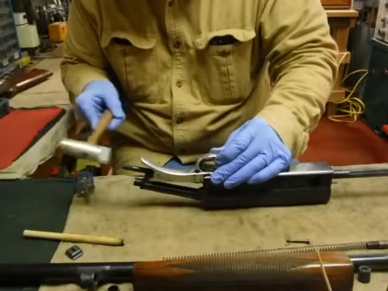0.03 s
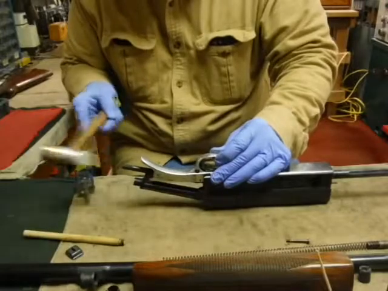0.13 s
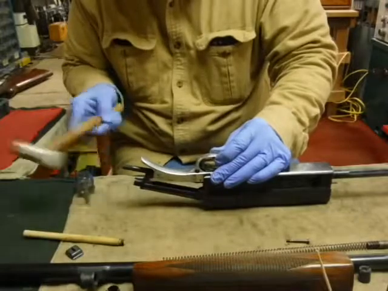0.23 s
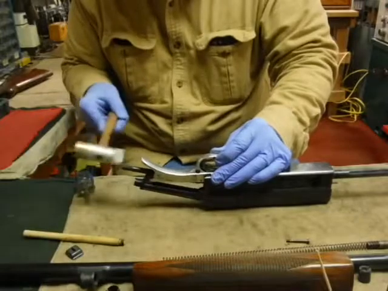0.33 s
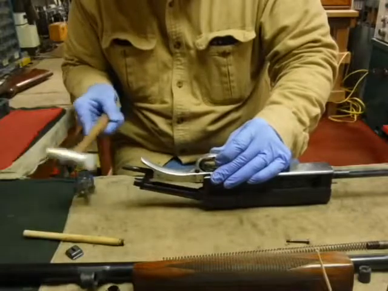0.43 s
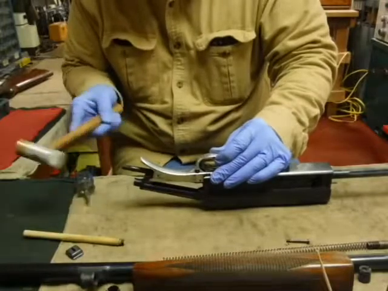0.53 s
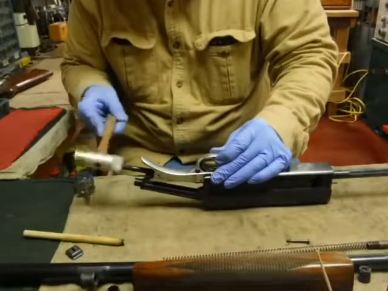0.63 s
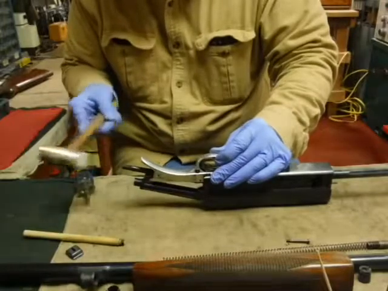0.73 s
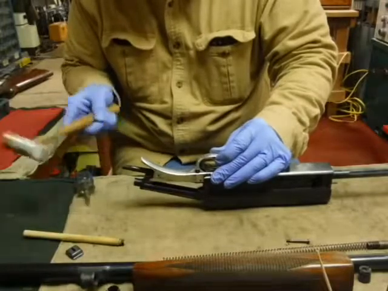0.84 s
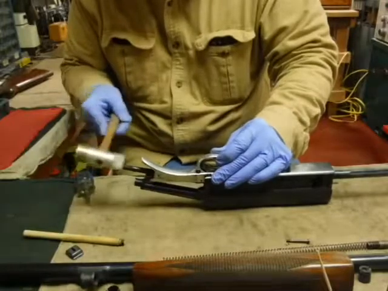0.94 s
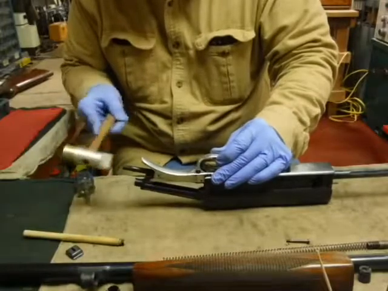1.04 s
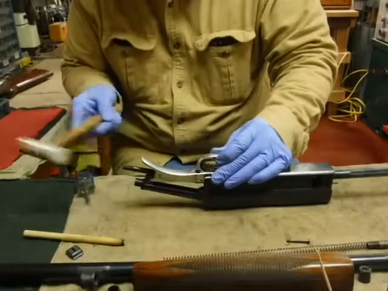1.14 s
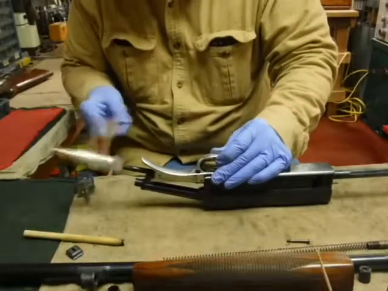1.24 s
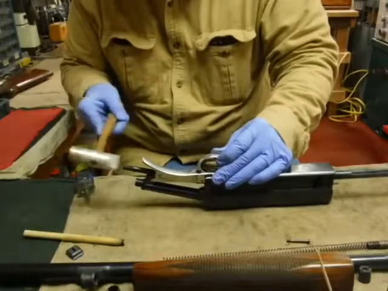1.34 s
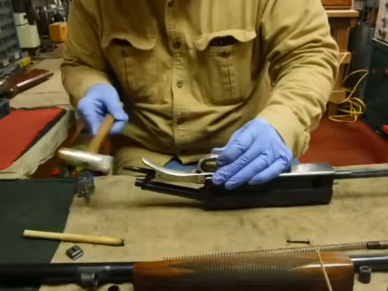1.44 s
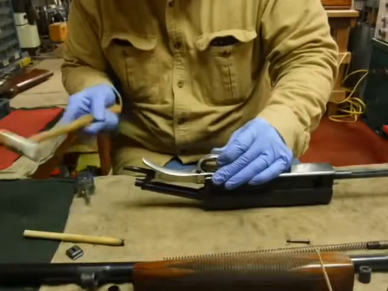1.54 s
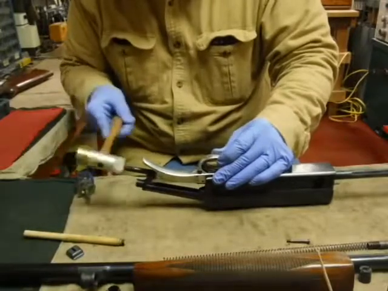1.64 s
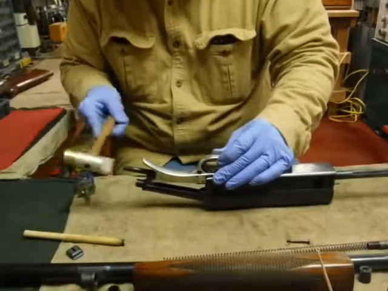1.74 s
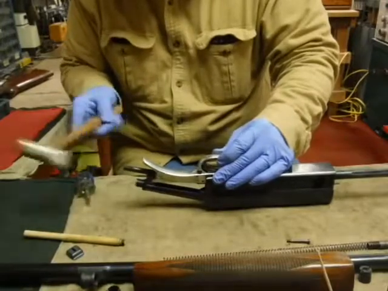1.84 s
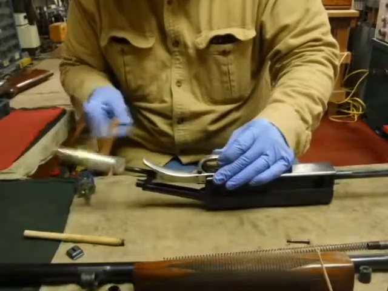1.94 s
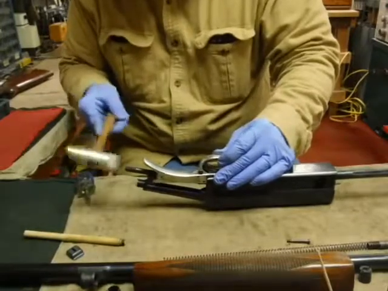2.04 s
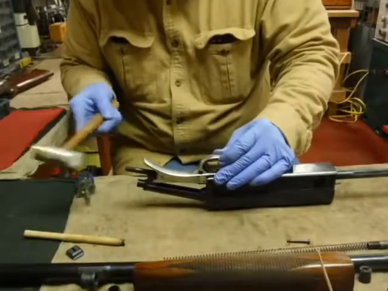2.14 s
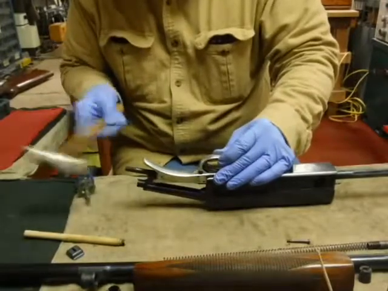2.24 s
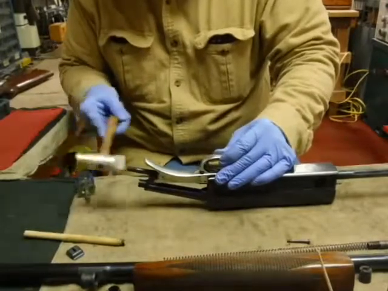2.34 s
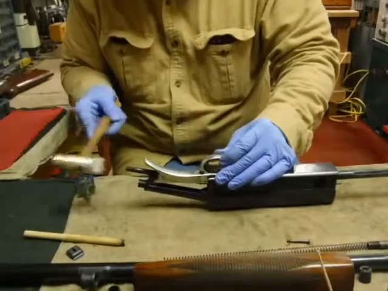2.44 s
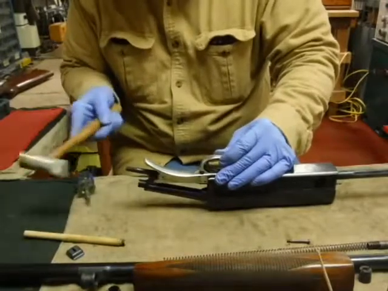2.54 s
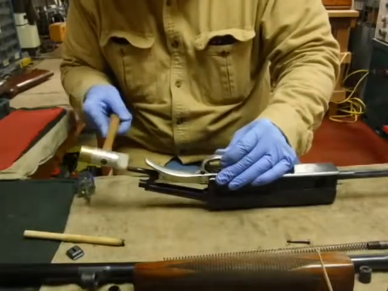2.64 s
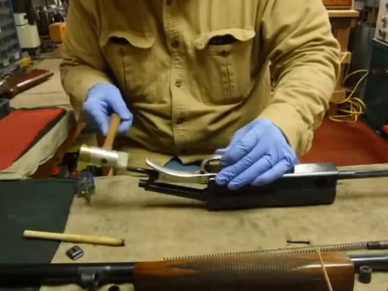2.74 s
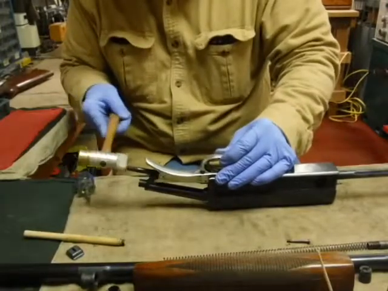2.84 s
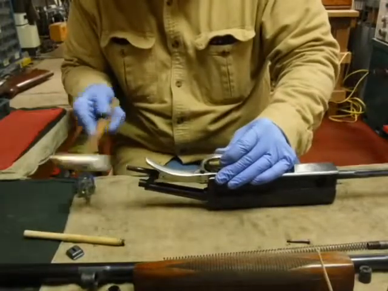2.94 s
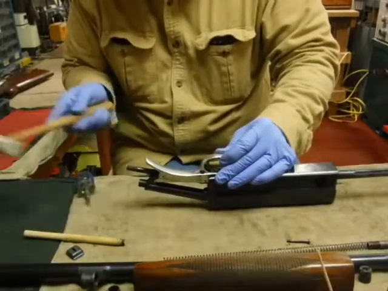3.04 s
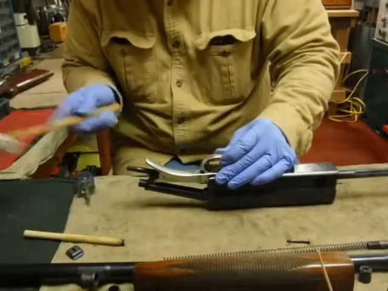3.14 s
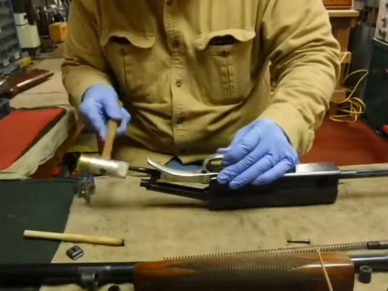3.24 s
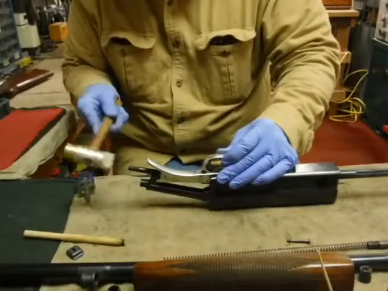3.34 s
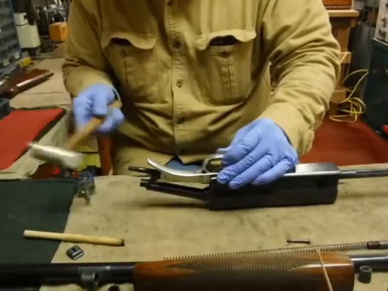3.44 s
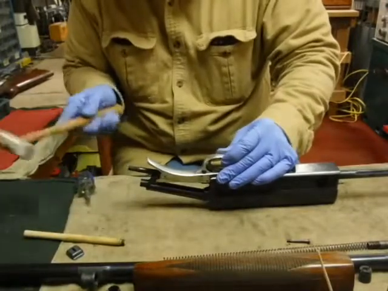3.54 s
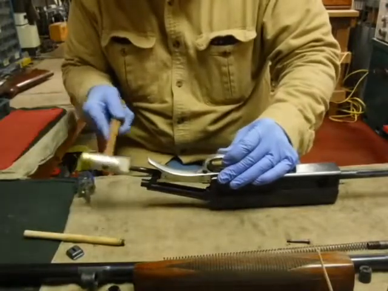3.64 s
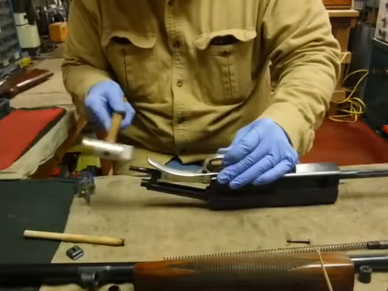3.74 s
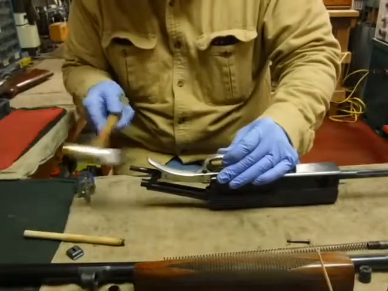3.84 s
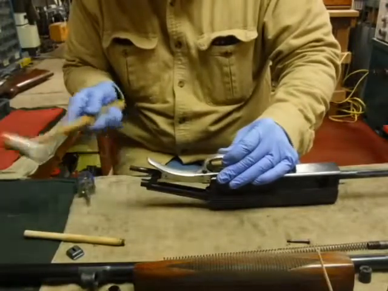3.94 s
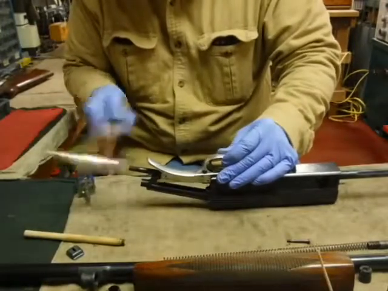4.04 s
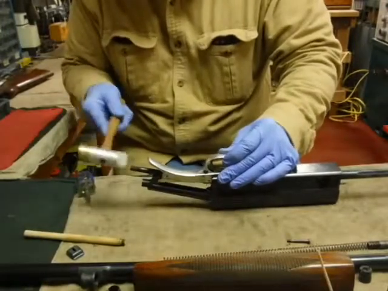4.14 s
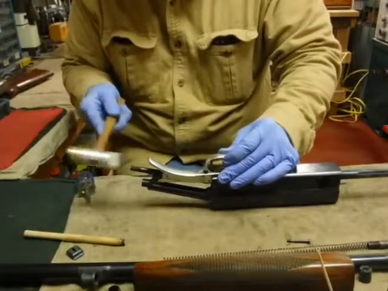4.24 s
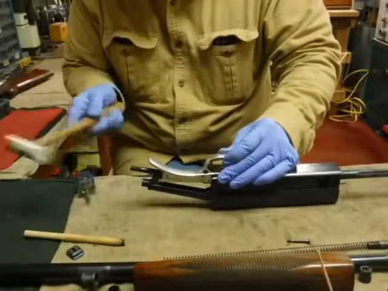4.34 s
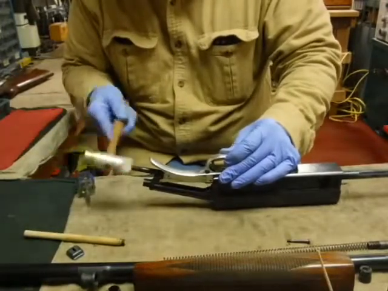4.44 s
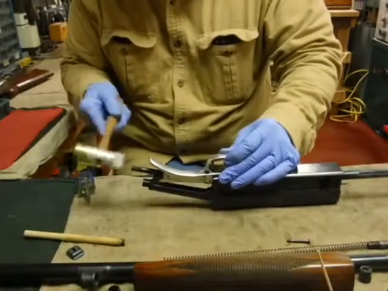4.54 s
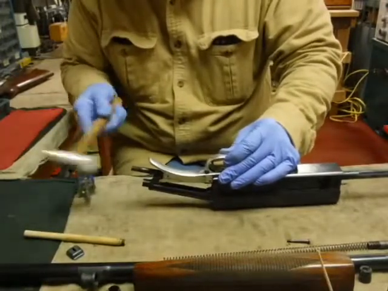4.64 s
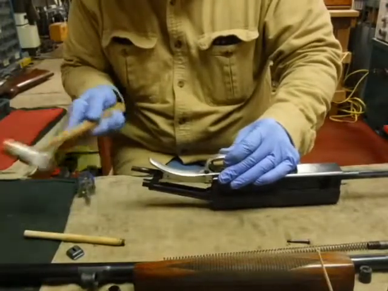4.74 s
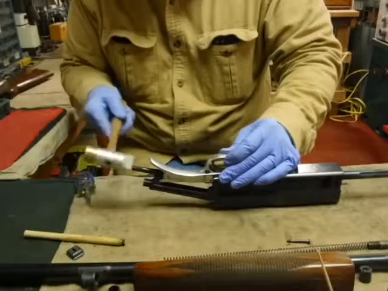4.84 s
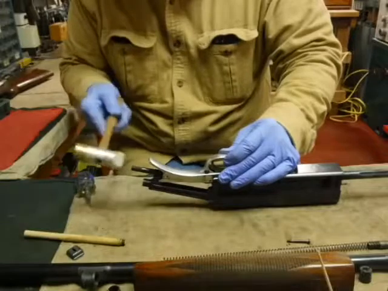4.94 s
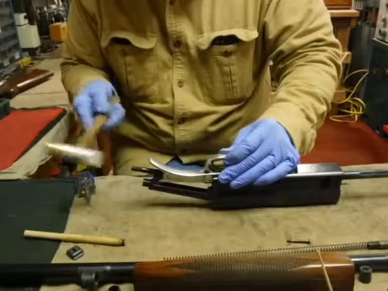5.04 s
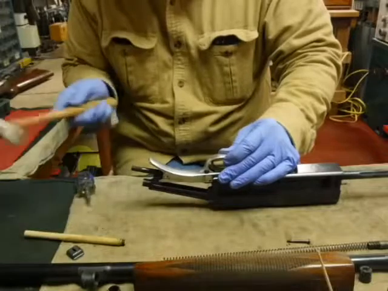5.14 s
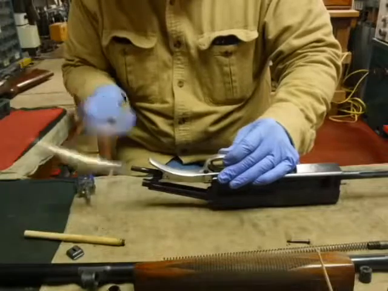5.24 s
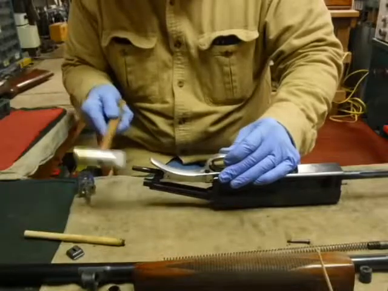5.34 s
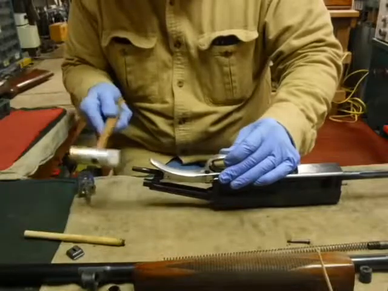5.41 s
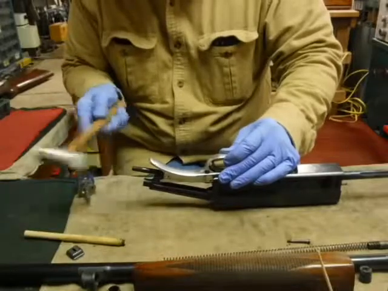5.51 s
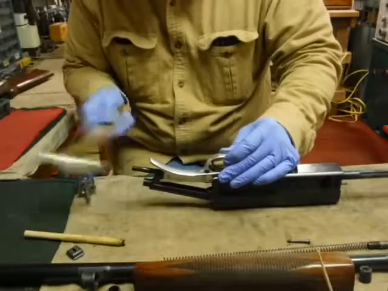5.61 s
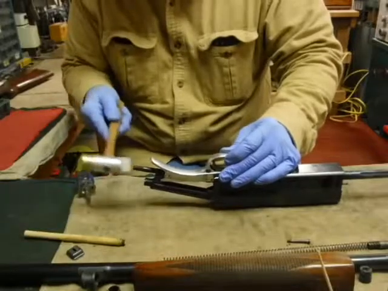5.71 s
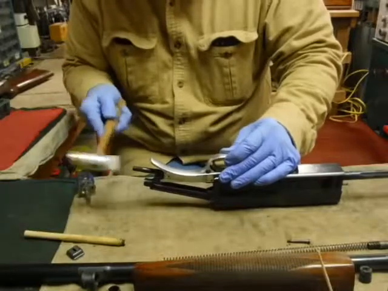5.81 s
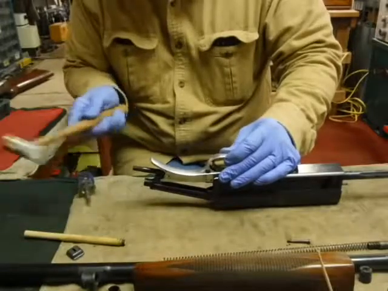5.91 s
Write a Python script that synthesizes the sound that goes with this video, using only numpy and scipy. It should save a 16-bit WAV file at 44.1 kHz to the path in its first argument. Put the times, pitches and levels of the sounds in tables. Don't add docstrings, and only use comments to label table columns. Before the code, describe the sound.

A small hammer strikes an aluminium part on a workbench in steady, sharp, clattering metallic blows, each ringing briefly and overloading the close microphone.

```python
import sys
import numpy as np
from scipy import signal
from scipy.io import wavfile

SR = 44100
rng = np.random.default_rng(int(sys.argv[2]) if len(sys.argv) > 2 else 0)


def rack_gain(trim_db):
    fader = np.asarray(trim_db, float)
    return 10 ** (fader / 20)


def dump_mix(stems):
    frames = np.atleast_2d(stems).T
    limited = np.clip(frames, -1, 1)
    pcm = np.round(limited * 32767).astype(np.int16)
    wavfile.write(sys.argv[1], SR, pcm)


N = 263256
TAIL = SR // 2


def at_hz(points, hz):
    points = np.array(points)
    return np.interp(np.log(hz), np.log(points[:, 0]), points[:, 1])


def rms_one(x):
    return x / np.sqrt(np.mean(x ** 2) + 1e-20)


def dying(t60_s):
    return rack_gain(-60 * np.arange(TAIL) / SR / t60_s)


def bandpass(x, order, low_hz, high_hz):
    return signal.sosfilt(signal.butter(order, [low_hz, high_hz], "band", fs=SR, output="sos"), x)


def third_octaves(white):
    edges_hz = 20.7 * 2 ** np.arange(0, 9.7, 1 / 3)
    for k, (low_hz, high_hz) in enumerate(zip(edges_hz, edges_hz[1:])):
        yield np.sqrt(low_hz * high_hz), bandpass(white[k % 2], 2, low_hz, high_hz)


def add(out, start_s, sound):
    at = round(start_s * SR)
    piece = sound[max(-at, 0):N - at]
    first = max(at, 0)
    out[first:first + len(piece)] += piece


def resonate(x, hz, width_hz):
    r = np.exp(-np.pi * width_hz / SR)
    struck = x * np.sqrt(2 * (1 - r * r))
    struck[:, 0] = np.sign(x[:, 0])
    return signal.lfilter([1, 0, -1], [1, -2 * r * np.cos(2 * np.pi * hz / SR), r * r], struck) / 2


def blows():
    # start in s, force in dB, free ring in dB as the grip loosens, dry clatter in dB,
    # main ring left by the fingers in dB.
    blow_rows = [(.2978, -3, .5, 8.5, -2.2), (.6075, -3.5, 1.5, 6.5, -1.5), (.9126, -0.5, 0, 6.5, -1.5),
                 (1.2626, 0.1, 2, 6, 1.7), (1.6496, 0.9, 2, -2, -1.2), (1.9961, 0, 3.5, 2, -0.5),
                 (2.3126, 1, 1.9, 2, -0.3), (2.6456, -1, 1.5, 5, -8), (3.2354, 4.5, 1, 2.5, 0.5),
                 (3.6467, 2.5, 4, -1.5, 0.7), (4.0958, 2, 5.5, 1.5, 1.2), (4.4734, 1.2, 6.5, -3.5, 1.5),
                 (4.8378, 2.2, 5.5, 1, -3.5), (5.2985, 3, 6.5, -7.5, 0.3), (5.6725, 1.9, 7, -3, -1.3)]
    earlier_blow = (0.0546, -1.3, 1.2, 2.4, 0)
    # frequency in Hz, level in dB, t60 in s.
    crack = (2700, 4.6, 0.0011)
    # frequency in Hz, level at rest in dB,
    # dB per dB of force, dB per dB of free ring.
    answer = [(220, 4, 0.44, -0.36), (1350, -0.17, 1.03, -0.12), (3000, -0.55, 0.95, 1.09),
              (9000, 0.86, 0.91, 0.52)]
    # frequency in Hz, level in dB per Hz.
    room_colour = [(24, -45.5), (40, 1.5), (91, -35.5), (140, -0.5), (269, -14), (340, -11), (600, -6),
                   (990, -10.5), (1300, -5.5), (2100, -8.5), (2980, -6.5), (5180, -6.5), (9940, 4.5),
                   (13800, -15.5), (16000, -43.5)]
    dry_colour = [(24, -43.5), (40, -38.5), (209, -31), (529, -15), (1210, 2.5), (2100, 3.5), (2380, -1),
                  (2700, -4), (4030, 4.5), (5050, 0.5), (9940, 4), (13400, -9), (16000, -100)]
    # frequency in Hz, t60 in s.
    room_t60 = [(60, .35), (160, 0.34), (420, 0.35), (1100, 0.37), (2900, 0.37), (6000, 0.26),
                (10000, 0.18), (12500, .17), (15000, .13)]
    dry_t60 = [(100, 0.022), (1500, 0.07), (5000, 0.068), (10000, 0.044), (15000, 0.094)]
    # frequency in Hz, share 0-1.
    same_room = [(300, .5), (700, .7), (1500, .85), (3000, .68), (6000, .45), (10000, .35)]
    mode_hz = [143, 225, 270, 1098, 1268, 1290, 1418, 1490, 1560, 1860, 2020, 2390, 2636, 2797, 2920, 3140,
               3546, 4020, 4340, 5685, 8115, 9500, 10280]
    # width in Hz, level in dB, t60 as a share of the room's.
    mode_ring = [(45, -2.5, 0.92), (30, 3, 0.66), (25.4, 1, 0.96), (50, 0.96, 1.1), (25, 12, 0.55),
                 (110, 13.5, 0.94), (95, 10, 1), (44.4, 10.5, 1.01), (93, 16, 0.85), (50, 7.1, 0.84),
                 (70, 2, 0.78), (78, 19.5, 0.56), (50, 10, 0.51), (45, 12.5, 0.65), (260, 13.5, 0.8),
                 (90, 10.9, 0.53), (70, 10, 0.65), (90, 11, .7), (130, 8.5, 0.92), (160, 9.5, 1.1),
                 (150, 4.8, 0.48), (890, 5.2, 0.35), (60, 21, 0.4)]
    main_ring_hz = (1350, 1700)
    room_db, ring_db, spread_db = -3.0, -34.0, 2.0
    buildup_s, rise_s = 0.0023, 0.00013
    clean_db, clean_width_hz = -5.5, 75
    longest_ring = 1.1

    table = np.array([earlier_blow] + list(blow_rows))
    table[0, 0] *= -1
    force_db, free_db, clatter_db, grip_db = table[:, 1:, None].transpose(1, 0, 2)
    curves = np.array(answer)

    def colour_db(hz):
        rest, per_force, per_free = [at_hz(curves[:, [0, k]], hz) for k in (1, 2, 3)]
        return rest + per_force * force_db + per_free * free_db

    def mixed(x, hz):
        share = at_hz(same_room, hz)
        return np.sqrt(share) * x[:1] + np.sqrt(1 - share) * x[1:]

    t = np.arange(TAIL) / SR
    white = rng.standard_normal((len(table) + 1, 2, TAIL)).transpose(1, 0, 2)
    crack_hz, crack_db, crack_t60_s = crack
    push = np.sin(2 * np.pi * crack_hz * t) * dying(crack_t60_s)
    sound = rack_gain(crack_db + colour_db(crack_hz)) * push
    for hz, band in third_octaves(white):
        room = rack_gain(room_db + at_hz(room_colour, hz)) * dying(at_hz(room_t60, hz))
        room = room * (1 - np.exp(-t / buildup_s))
        clatter = rack_gain(at_hz(dry_colour, hz) + clatter_db) * dying(at_hz(dry_t60, hz))
        clatter = clatter * (1 - np.exp(-t / rise_s))
        sound = sound + rack_gain(colour_db(hz)) * mixed(band, hz) * (room + clatter)

    luck = rng.standard_normal((len(table), len(mode_hz)))
    for k, (hz, (width_hz, level_db, share)) in enumerate(zip(mode_hz, mode_ring)):
        fingers_db = grip_db * (main_ring_hz[0] < hz < main_ring_hz[1])
        strength_db = ring_db + level_db + colour_db(hz) + fingers_db + spread_db * luck[:, k:k + 1]
        reflections = mixed(white[k % 2, :, ::-1], hz)
        ring = resonate(reflections, hz, max(width_hz, hz / 60))
        if width_hz < clean_width_hz:
            line = np.sqrt(2) * np.sin(2 * np.pi * hz * t + k)
            ring = rack_gain(-1.0) * ring + rack_gain(clean_db) * line
        decay = dying(min(share, longest_ring) * at_hz(room_t60, hz))
        sound = sound + rack_gain(strength_db) * ring * decay

    out = np.zeros(N)
    for start_s, blow in zip(table[:, 0], sound):
        add(out, start_s, rack_gain(1.5) * blow)
    return out


def background():
    # frequency in Hz, level in dB per Hz.
    hiss_colour = [(20, -12), (40, -1), (120, -10), (270, -11.5), (530, -15), (1000, -15.5), (2000, -19),
                   (4000, -22), (8000, -23.5), (16000, -28)]
    # frequency in Hz, level in dB rms.
    hum_lines = [(120, -72), (240, -66), (360, -71), (480, -72)]
    # time in s, level in dB.
    rustle = [
        (2.88, -75),
        (2.92, -70),
        (2.95, -56.5),
        (2.98, -76),
    ]
    hiss_db = -55
    t = np.arange(N) / SR
    bands = third_octaves(rng.standard_normal((2, N)))
    hiss = sum(rack_gain(at_hz(hiss_colour, hz)) * band for hz, band in bands)
    hum = sum(np.sqrt(2) * rack_gain(level_db) * np.sin(2 * np.pi * hz * t) for hz, level_db in hum_lines)
    cloth = rms_one(bandpass(rng.standard_normal(N), 2, 4000, 13000))
    rustle_db = np.interp(t, *np.transpose(rustle))
    return rack_gain(hiss_db) * rms_one(hiss) + hum + rack_gain(rustle_db) * cloth


def ticks():
    # start in s, peak in dB, brightness in dB per octave.
    light_ticks = [
        (2.49, -41, -1),
        (3.0248, -47, -2),
        (3.043, -43, -6),
        (3.0478, -45, -1),
        (3.058, -49.5, -5),
        (3.118, -46.5, -4),
        (3.1288, -53, 6),
        (3.15, -53.5, 4),
        (3.857, -37, -6),
    ]
    # start in s, peak in dB, brightness in dB per octave, t60 in s,
    # dull knock in dB.
    drops = [
        (2.2687, -48, 2, 0.011, 10),
        (3.8574, -26.5, -27, 0.024, 0),
        (3.864, -47, -17, 0.16, 9),
    ]
    # centre in Hz, width in Hz, level in dB.
    piece_bands = [(3900, 900, -1), (6600, 1400, 0), (10000, 1800, -3), (13000, 1500, -8)]
    tick_t60_s, tick_knock_db = 0.0065, -21
    rows = [(*row, tick_t60_s, tick_knock_db) for row in light_ticks] + list(drops)
    out = np.zeros(N)
    for start_s, peak_db, bright_db, t60_s, knock_db in rows:
        burst = rng.standard_normal(TAIL) * dying(t60_s)
        sound = rack_gain(knock_db) * bandpass(burst, 1, 500, 1500)
        for hz, width_hz, level_db in piece_bands:
            band = bandpass(burst, 1, hz - width_hz / 2, hz + width_hz / 2)
            sound += rack_gain(level_db + bright_db * np.log2(hz / 4000)) * band
        add(out, start_s, rack_gain(peak_db + 11.5) * sound)
    return out


def knocks():
    # start in s, level in dB.
    bumps = [
        (2.271, -57),
        (2.904, -52.5),
        (2.918, -49),
        (3.01, -57),
        (3.86, -39.5),
    ]
    t = np.arange(TAIL) / SR
    modes = np.sin(2 * np.pi * 272 * t) + 0.3 * np.sin(2 * np.pi * 225 * t)
    thud = modes * dying(0.25) * (1 - np.exp(-t / 0.0028))
    out = np.zeros(N)
    for start_s, level_db in bumps:
        add(out, start_s, rack_gain(level_db) * thud)
    return out


def glitch():
    spike = (3.779, -7)
    out = np.zeros(N)
    out[round(spike[0] * SR)] = -rack_gain(spike[1])
    return out


def scene():
    return (blows() + background() + ticks() + knocks() + glitch())[None]


def low_pass(x):
    return signal.sosfilt(signal.butter(12, 16190, fs=SR, output="sos"), x)


def record(dry):
    ceiling, knee, cutoff_hz = 0.87, 8.0, 16150
    clipped = dry / (1 + np.abs(dry / ceiling) ** knee) ** (1 / knee)
    lowpass = signal.cheby2(14, 30, cutoff_hz, fs=SR, output="sos")
    return low_pass(signal.sosfiltfilt(lowpass, clipped))


dry = scene()
out = record(dry)
dump_mix(out)
```